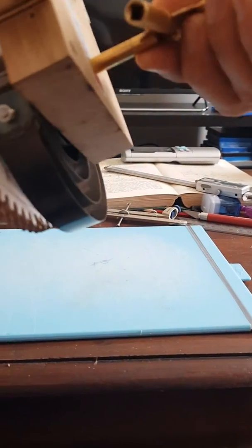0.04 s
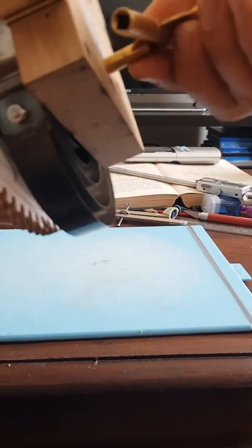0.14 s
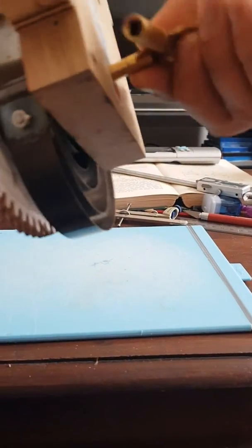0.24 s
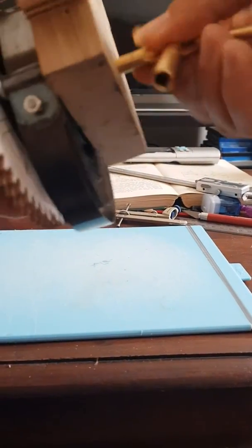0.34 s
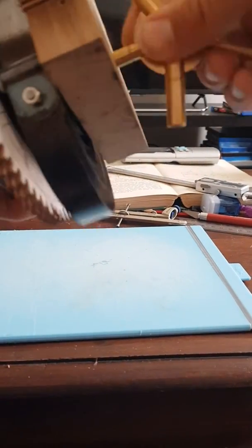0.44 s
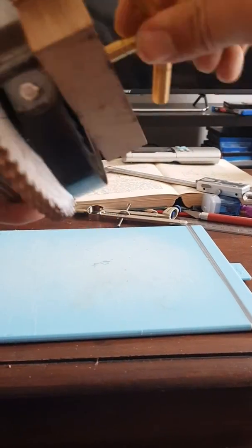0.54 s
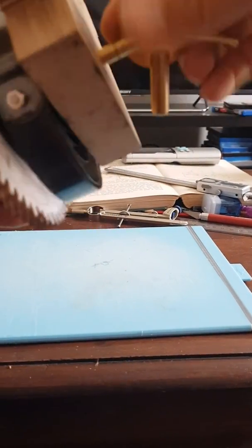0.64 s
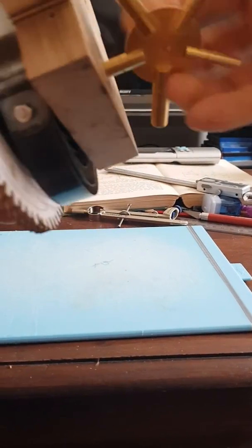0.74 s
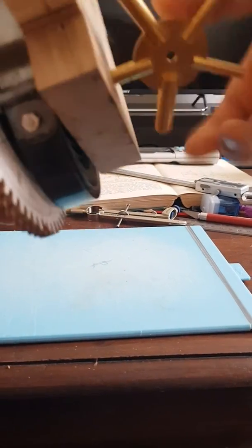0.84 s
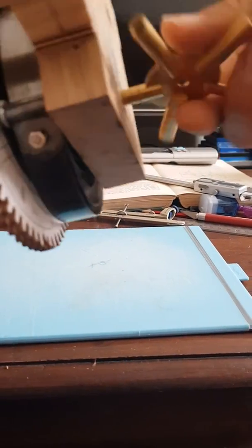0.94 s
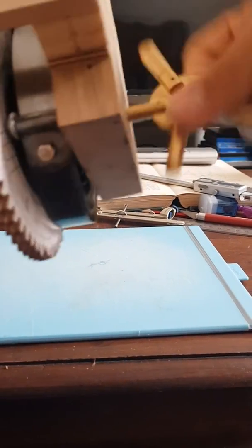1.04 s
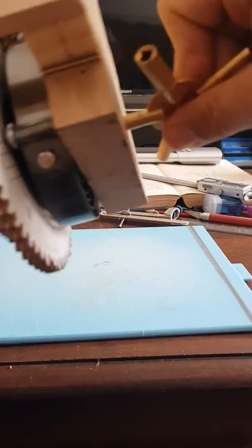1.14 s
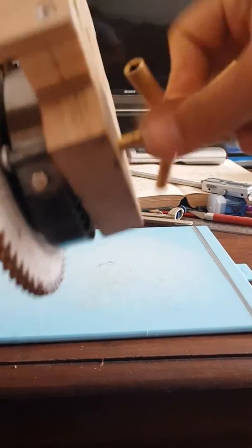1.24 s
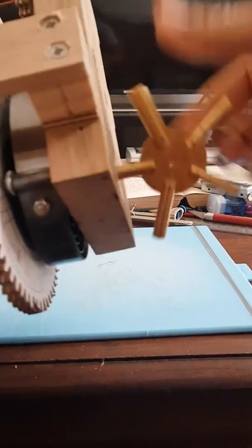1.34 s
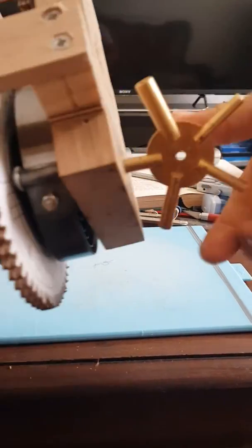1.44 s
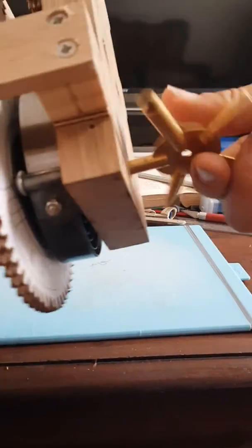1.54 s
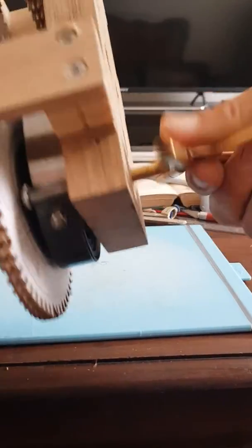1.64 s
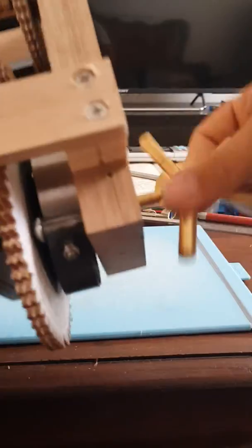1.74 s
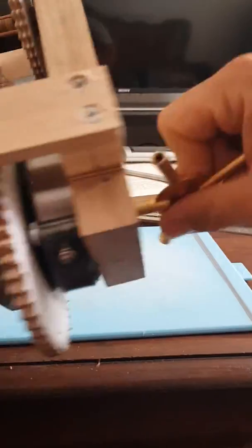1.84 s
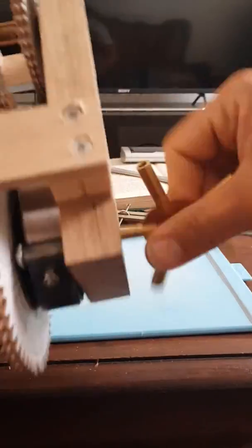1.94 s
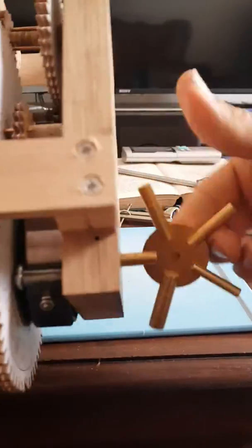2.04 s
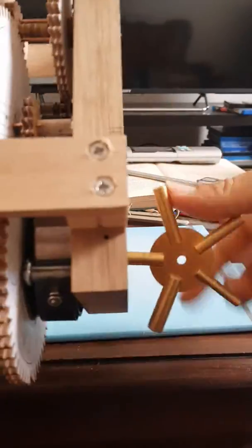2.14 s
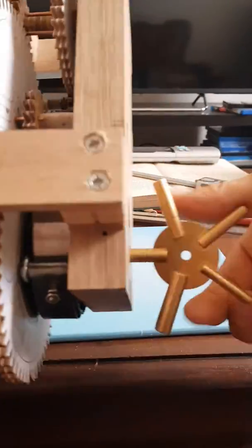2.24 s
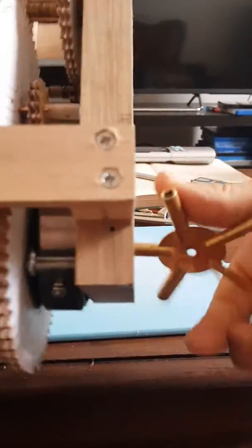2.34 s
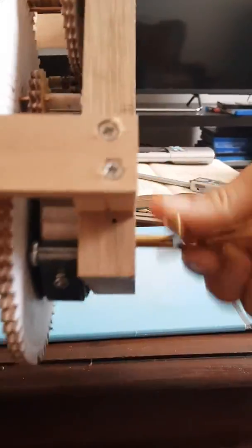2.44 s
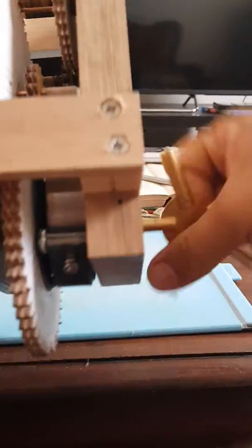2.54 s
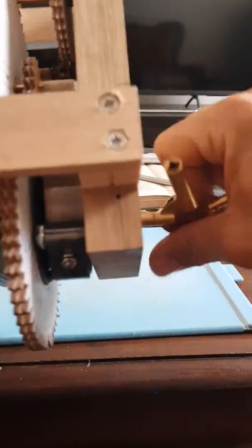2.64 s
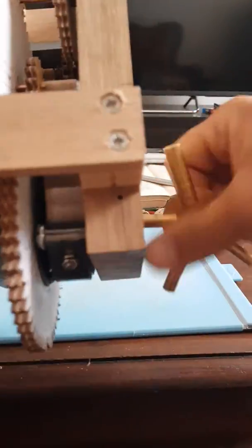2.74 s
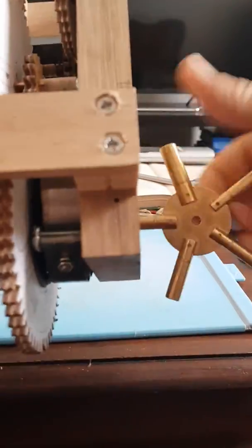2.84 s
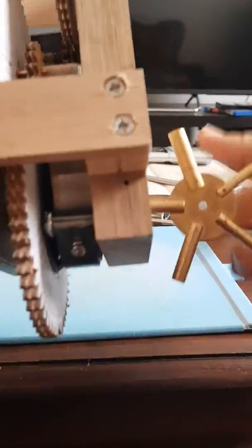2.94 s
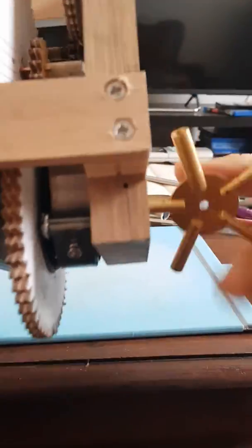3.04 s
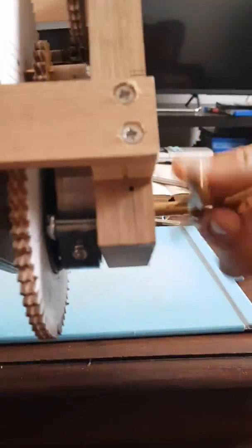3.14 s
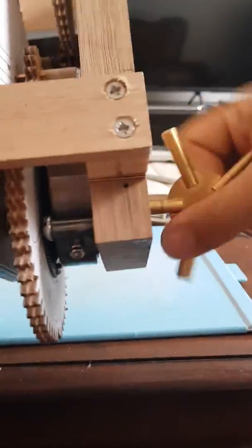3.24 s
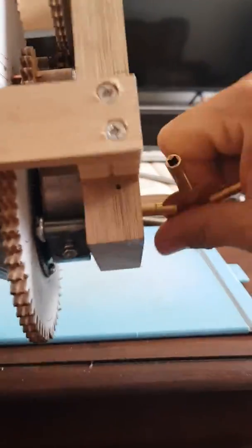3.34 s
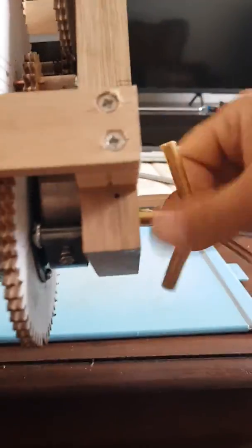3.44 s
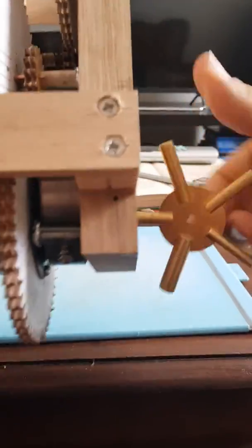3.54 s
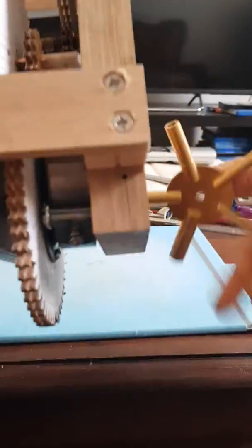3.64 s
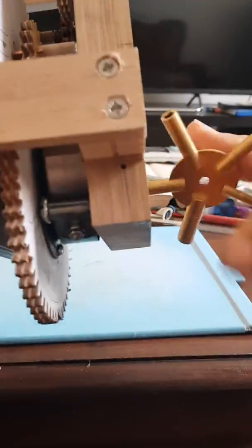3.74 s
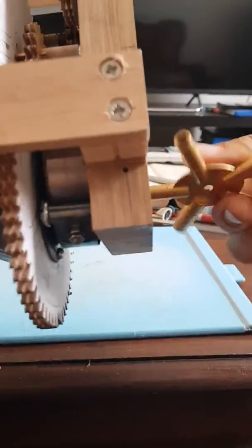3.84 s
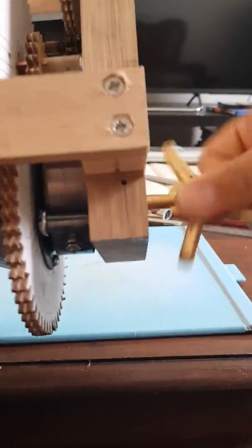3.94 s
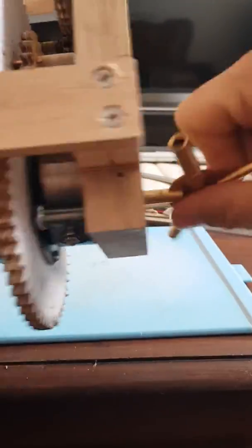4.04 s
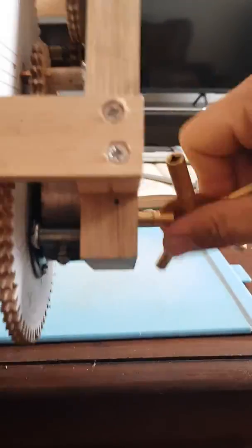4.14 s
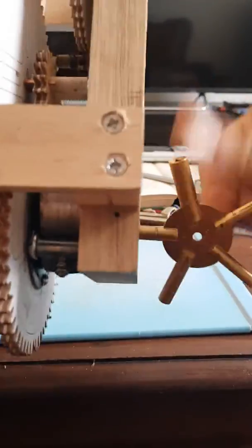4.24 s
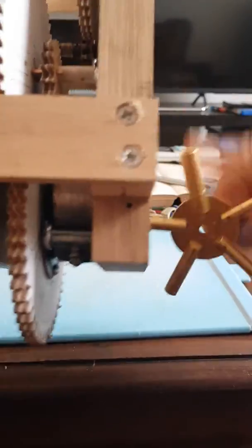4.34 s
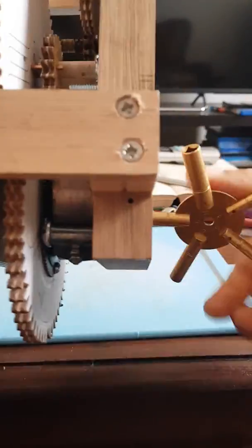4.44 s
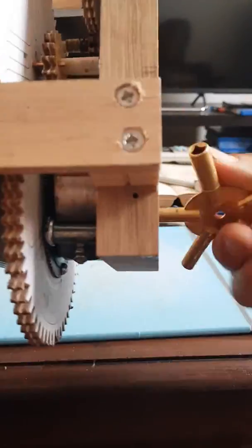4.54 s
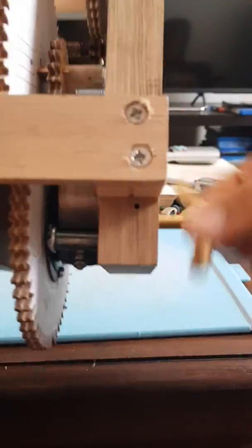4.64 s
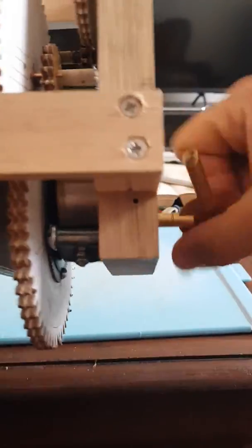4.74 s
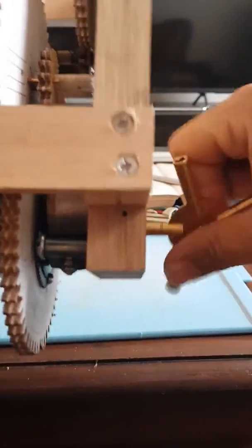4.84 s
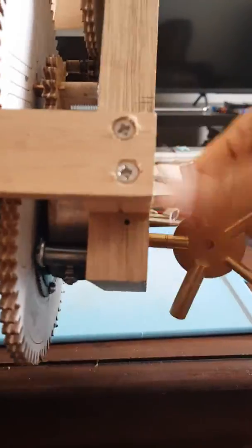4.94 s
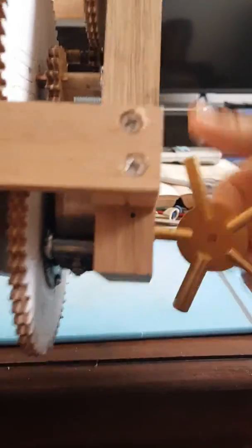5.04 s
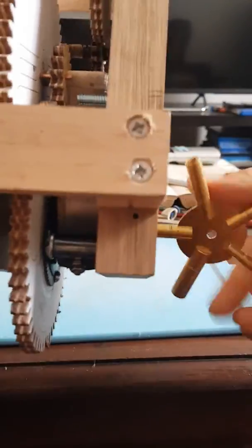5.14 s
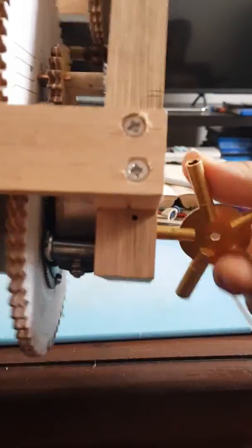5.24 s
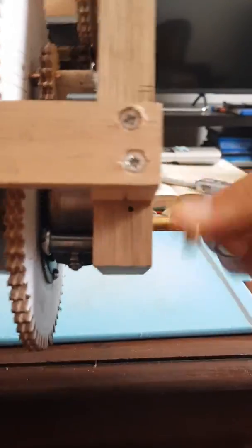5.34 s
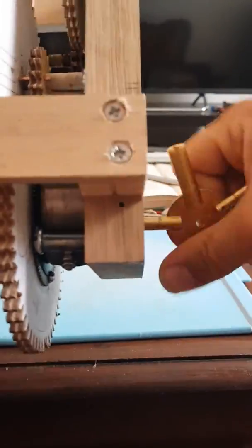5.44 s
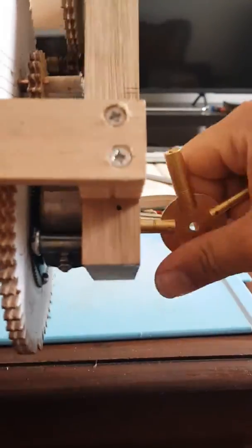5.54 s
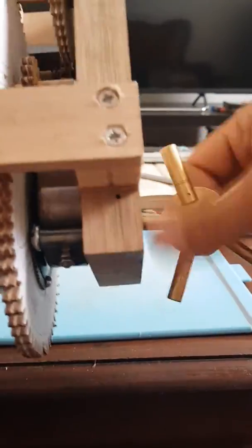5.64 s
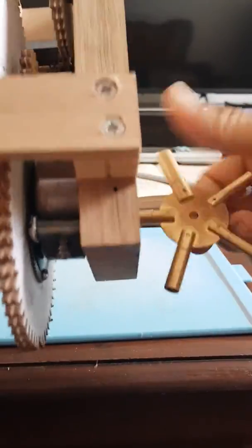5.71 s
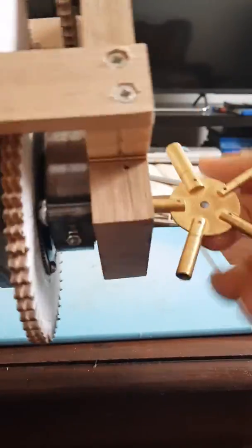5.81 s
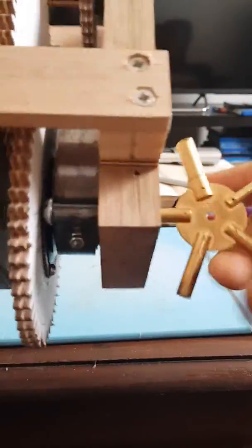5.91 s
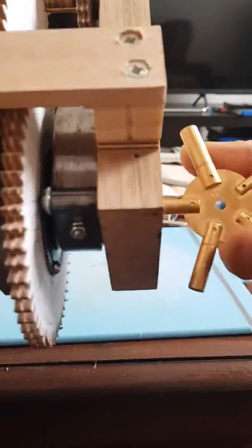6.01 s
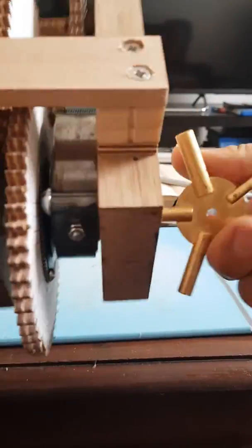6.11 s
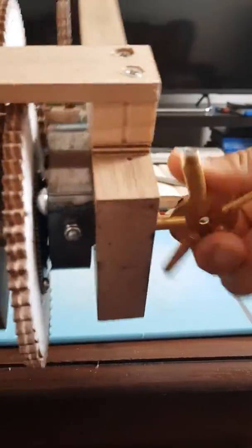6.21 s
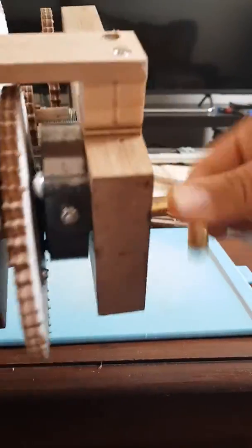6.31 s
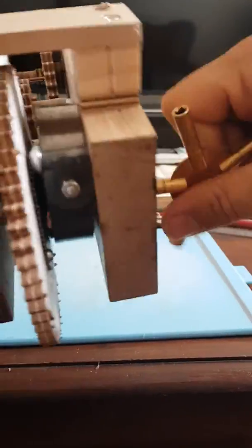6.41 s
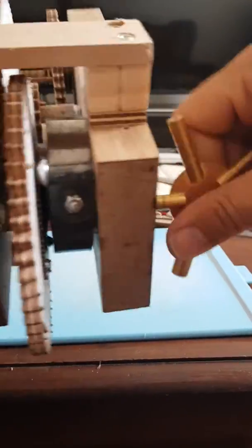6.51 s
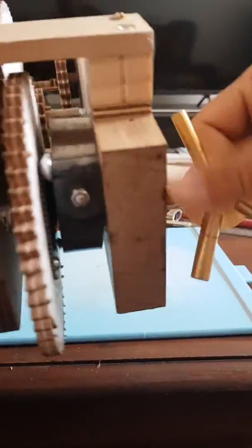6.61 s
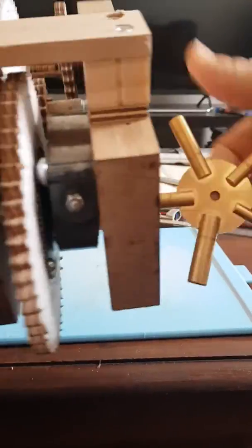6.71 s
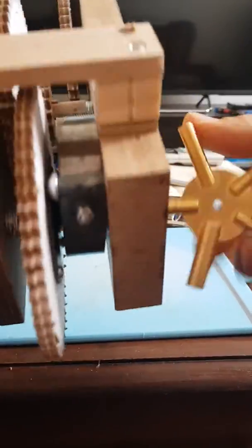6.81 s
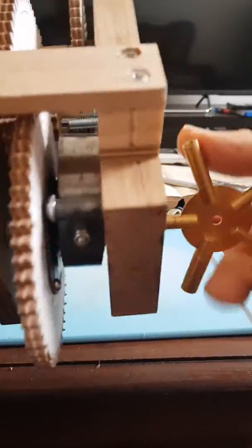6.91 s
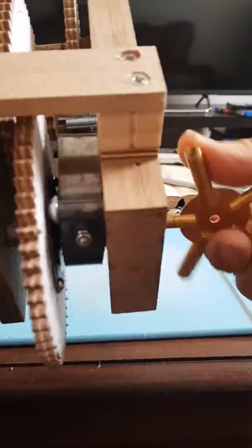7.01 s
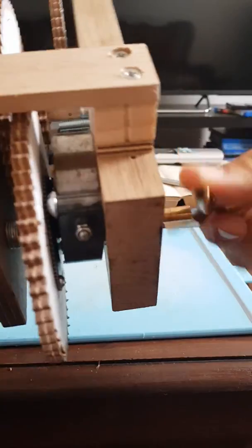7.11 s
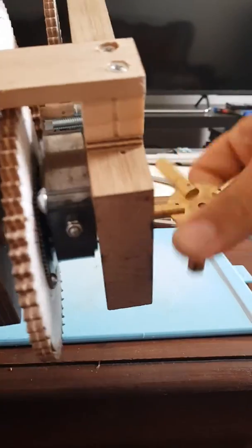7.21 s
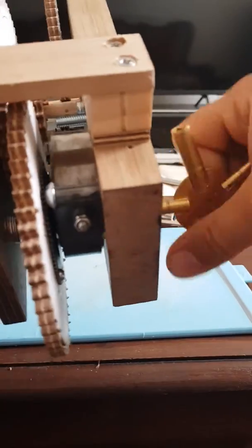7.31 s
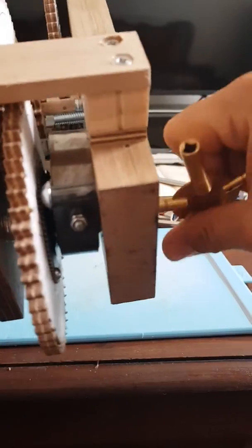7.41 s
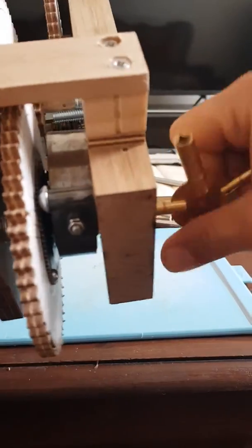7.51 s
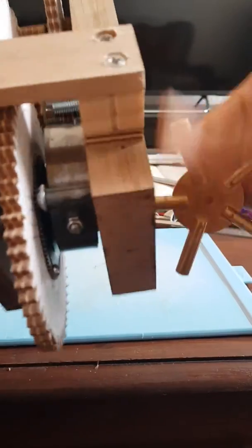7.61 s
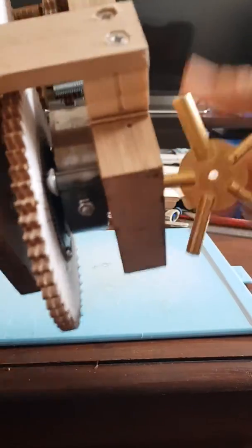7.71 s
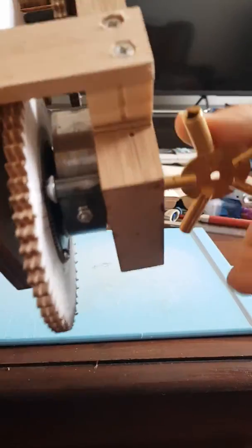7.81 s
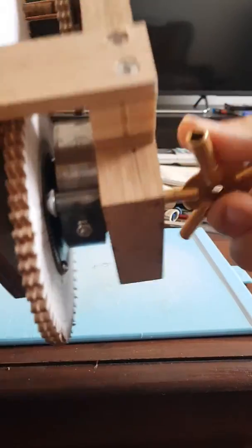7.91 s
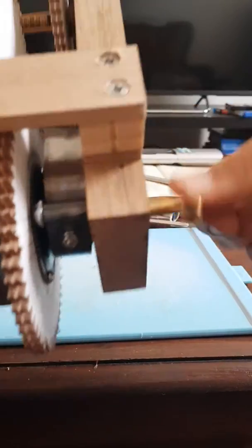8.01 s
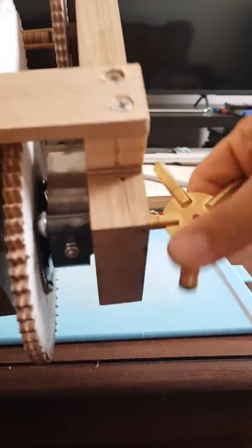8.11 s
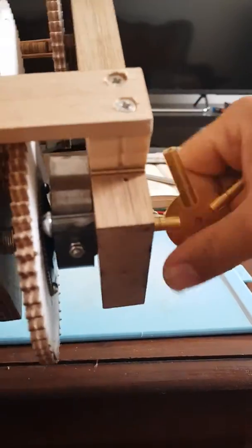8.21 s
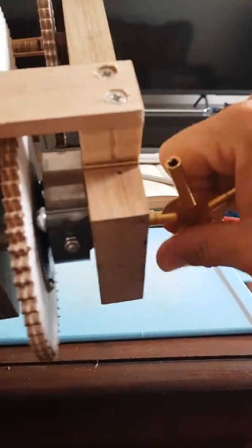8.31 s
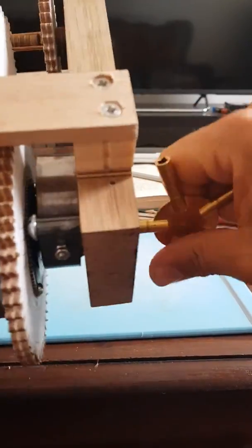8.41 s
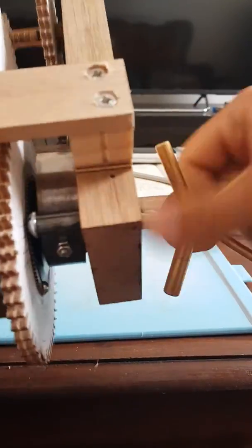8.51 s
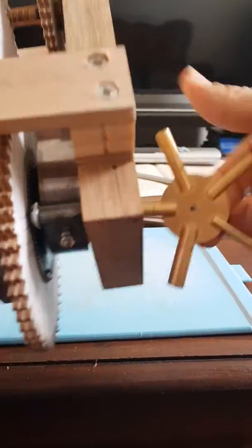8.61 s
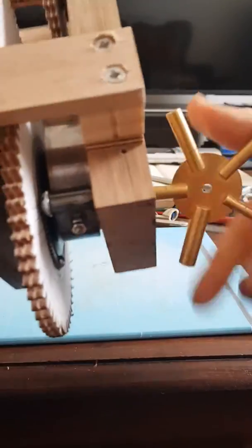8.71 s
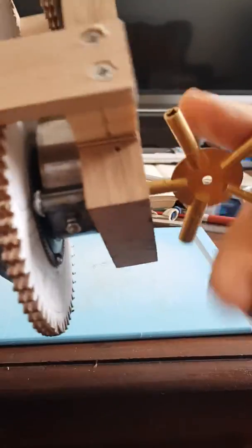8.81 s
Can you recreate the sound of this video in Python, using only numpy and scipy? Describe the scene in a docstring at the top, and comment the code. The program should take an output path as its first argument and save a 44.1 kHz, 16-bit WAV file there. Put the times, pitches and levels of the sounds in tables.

```python
"""The mainspring of a hand-held wooden clock is wound with a brass key, in eleven short twists, close to a phone.
In each twist the pawl snaps over five to eight ratchet teeth, made of short noise bursts with a tiny bounce.
Then the wheel settles back and knocks the wooden frame, whose resonances colour the blow.
Slack coils scrape at first and fingers rub on frame and key, as grains of noise; key and spring ring as fading sines.
The quiet room answers with echoes made of fading noise, over faint air noise and a low mains hum."""
import sys
import numpy as np
from scipy import signal
from scipy.fft import rfft, irfft
from scipy.io import wavfile

SR = 44100
rng = np.random.default_rng(int(sys.argv[2]) if len(sys.argv) > 2 else 0)


def persist_wave(psi):
    """Save psi, clipped to +-1, as 16-bit WAV."""
    counts = np.round(np.clip(psi, -1, 1) * 32767).astype(np.int16)
    wavfile.write(sys.argv[1], SR, np.atleast_2d(counts).T)


N = 390726
TIME = np.arange(N) / SR
TOP_HZ = 15900  # the phone hears nothing much above this


def undb(db):
    """Decibels to gain."""
    return 10 ** (np.asarray(db) / 20)


def unit(x):
    """Scale to an average power of one, summed over the last axis."""
    return x / np.sqrt(np.mean(np.sum(x ** 2, axis=-1)))


def curve(rows):
    """Gain over time from rows of seconds and dB."""
    return undb(np.interp(TIME, *np.transpose(rows)))


def response(points, size=4096):
    """Impulse response with the given spectrum (Hz, dB), its energy as early as possible (minimum phase)."""
    hz, db = np.transpose(points)
    grid = np.maximum(np.fft.rfftfreq(size, 1 / SR), 1)
    log_gain = np.log(undb(np.interp(np.log(grid), np.log(hz), db)))
    # folding the cepstrum's second half onto its first makes the response causal
    cepstrum = irfft(log_gain)
    cepstrum[1:size // 2] *= 2
    cepstrum[size // 2 + 1:] = 0
    return irfft(np.exp(rfft(cepstrum)))


def through(x, h):
    """Pass a sound through a response, one or two channels each."""
    return signal.oaconvolve(np.atleast_2d(x), np.atleast_2d(h), axes=1)[:, :x.shape[-1]]


def add(track, s, sound):
    """Mix a sound into a track at time s."""
    i = max(int(s * SR), 0)
    track[:, i:i + sound.shape[-1]] += sound[..., :N - i]


def fade(t, t60):
    """Exponential decay of 60 dB in t60 seconds."""
    return undb(-60 * t / t60)


def stroke(start, end, edge_s=.025):
    """A gesture that swells in and dies away between two times."""
    return np.clip(np.minimum(TIME - start, end - TIME) / edge_s + .5, 0, 1)


def walk(rate):
    """Random wander along straight lines between new random values, rate per second."""
    return np.interp(TIME * rate, np.arange(1024), rng.standard_normal(1024))


def tightened(first_and_last, s):
    """A value that moves evenly from the slack spring to the wound one."""
    return np.interp(s, [0, TIME[-1]], first_and_last)


def port_noise(size, likeness):
    """Noise for the left and right port, with a share in common."""
    noise = rng.standard_normal((3, size))
    share = np.clip(likeness, 0, 1)
    return np.sqrt(share) * noise[0] + np.sqrt(1 - share) * noise[1:]


def ring(modes, size=22050):
    """Fading sines from rows of Hz, dB and t60 in seconds, with a different phase at each port."""
    t = np.arange(size) / SR
    out = np.zeros((2, size))
    for hz, db, t60 in modes:
        phase = rng.normal(0, 1.0, (2, 1))
        out += undb(db) * fade(t, t60) * np.sin(2 * np.pi * hz * t + phase)
    return out


def grains(per_s, spread_db, likeness, slip_s=0.0033):
    """Stick-slip: short crunches at random moments, a few much larger than the rest."""
    happens = rng.random(N) < per_s / SR
    sizes = undb(spread_db * np.minimum(rng.exponential(size=N), 3)) * happens
    # the power of each crunch dies away over slip_s
    power = signal.lfilter([1], [1, -np.exp(-1 / (slip_s * SR))], sizes ** 2 + 1e-12)
    return np.sqrt(power / power.mean()) * port_noise(N, likeness)


# Colour of the quiet room's air.
# Each row: frequency in Hz, relative level in dB.
AIR_COLOUR = [(25, -7.5), (60, -2), (90, 2.5), (200, -12), (660, -15.5), (1000, -23.5), (1280, -19),
              (1600, -27), (2700, -38.5), (7500, -32.5), (16000, -26.5)]


def room_air(level_db=-70, waver_db=1):
    """Faint, gently wavering noise of the room's air."""
    air = through(port_noise(N, 0.82), unit(response(AIR_COLOUR)))
    return air * undb(level_db + waver_db * walk(3))


def mains_hum(hz=49.3, level_db=-70):
    """A low mains hum: one sine whose pitch and level waver."""
    hum = np.sqrt(2) * np.sin(2 * np.pi * hz * TIME + 0.27 * walk(4))
    return hum * undb(level_db + 1.5 * walk(8.7))


# Dull handling rumble that comes through the desk.
# Each row: start in seconds, end in seconds, level in dB, centre frequency in Hz.
HANDLING_RUMBLES = [(0, 0.544, -63, 53), (6.37, 6.407, -56, 138), (8.01, 8.09, -60.5, 70)]


def rumble():
    """Low, soft noise around one pitch as the hands shift their hold."""
    noise = port_noise(N, 0.68)
    out = np.zeros((2, N))
    for start, end, db, hz in HANDLING_RUMBLES:
        hump = unit(response([(hz / 4, -20), (hz, 0), (2 * hz, -9), (8 * hz, -50)]))
        out += undb(db) * stroke(start, end) * through(noise, hump)
    return out


def background():
    """Room air, mains hum and handling rumble together."""
    return room_air() + mains_hum() + rumble()


def echoes(low_t60=0.31, mid_t60=0.38, high_t60=.42, top_t60=0.29,
           wall_s=.0148, desk_db=-5, wall_db=3, size=24000):
    """Weak scatter from the desk, a first wall echo, then a tail of noise whose top treble dies first."""
    t, hz = np.arange(size) / SR, np.fft.rfftfreq(size, 1 / SR)
    noise = rfft(rng.standard_normal((2, size)))
    t60s = (low_t60, mid_t60, high_t60, top_t60)
    tail = np.zeros((2, size))
    # four overlapping bands, each with its own decay
    for band, t60 in zip(np.eye(len(t60s)), t60s):
        tail += irfft(noise * np.interp(hz, [500, 3500, 9000, 15000], band)) * fade(t, t60)
    scatter = undb(desk_db) * (t > .003)
    after_wall = undb(wall_db * np.exp(-abs(t - wall_s) / 0.0036))
    return unit(tail * np.where(t < wall_s, scatter, after_wall))


# Colour of the room's echo.
# Each row: frequency in Hz, relative level in dB.
ECHO_COLOUR = [(60, -13.5), (400, 2), (1300, -0.5), (2400, -0.5), (3600, -6), (5000, -7.5), (8000, -8.5),
               (13000, -7.5), (16000, -4)]


def room(x, count=4):
    """The clock sways in the hand, so its sound keeps passing from one echo pattern to the next."""
    place = TIME * 33  # patterns passed, 33 a second, going round and round
    out = np.zeros((2, N))
    for k in range(count):
        share = np.sqrt(np.maximum(1 - abs((place - k) % count - 1), 0))
        out += through(x * share, echoes())
    return through(out, response(ECHO_COLOUR))


# How much the phone's left port favours diffuse sound.
# Each row: frequency in Hz, left minus right in dB.
PORT_BALANCE = [(60, 4), (200, 3.5), (700, 2.5), (1290, -1), (2400, -2), (4400, 4.5), (8100, 10.5),
                (11000, 5), (15000, 8)]


def ports(x):
    """The left port faces the clock and hears more treble."""
    sides = [response([(hz, side * db / 2) for hz, db in PORT_BALANCE]) for side in (1, -1)]
    return through(x, np.array(sides))


def from_left(x, count=4):
    """Direct sound reaches the right port a few samples later."""
    return np.array([x[0], np.pad(x[1], (count, 0))[:N]])


def ring_at(taps, modes):
    """Ring the modes at each tap, given as seconds and dB."""
    out = np.zeros((2, N))
    for s, db in taps:
        add(out, s, undb(db) * ring(modes))
    return out


# The brass key is flicked as the fingers let go.
# Each row: time in seconds, relative level in dB.
KEY_FLICKS = [(2.11, -55), (6.77, -76), (7.745, -74)]
# Tones of the brass key.
# Each row: frequency in Hz, relative level in dB, time to fade by 60 dB in seconds.
KEY_TONES = [(1210, 2, 0.43), (3747, -8, .35), (6858, -19, 0.23), (7698, 13, 0.078), (9500, -2, 0.5),
             (9440, -6.5, 0.36)]


def brass_key():
    """The key rings on after a flick, as a set of fading sines."""
    return ring_at(KEY_FLICKS, KEY_TONES)


# The tight spring twangs as its load falls on the pawl.
# Each row: time in seconds, relative level in dB.
SPRING_TWANGS = [(6.517, -51.5), (7.474, -51), (8.411, -43.5)]
# Tones of the spring.
# Each row: frequency in Hz, relative level in dB, time to fade by 60 dB in seconds.
SPRING_TONES = [(997, -10, 0.2), (1390, -18, 0.19), (1873, 4, 0.1), (2300, 0, 0.11), (2988, -25, 0.23)]


def spring():
    """The spring twangs on, as a set of fading sines."""
    return ring_at(SPRING_TWANGS, SPRING_TONES)


# Colour of a thud in the wood.
# Each row: frequency in Hz, relative level in dB.
WOOD_COLOUR = [(40, -30), (200, -21), (330, -2), (500, -11), (700, -2), (1000, -18), (1350, 0), (2400, -2),
               (4500, -2.5), (8000, -17.5), (16000, -25.5)]
# Resonances of the wooden frame.
# Each row: frequency in Hz, width in Hz, relative level in dB.
FRAME_RESONANCES = [(337, 70, -9), (690, 110, -5), (1275, 60, 10.5), (1580, 130, -11.5), (2155, 190, 11.5),
                    (2410, 120, 4.5), (3159, 90, -2.5), (3750, 140, 9.5), (4300, 160, 6)]


def frame_response(modes_db=-1):
    """The wooden frame: a broad thud with a few short resonances on top; a wider one fades sooner."""
    tones = [(hz, db, np.log(1000) / np.pi / width) for hz, width, db in FRAME_RESONANCES]
    modes = ring(tones, size=4096)
    return unit(unit(response(WOOD_COLOUR)) + undb(modes_db) * unit(modes))


# Colour of a tick on the steel.
# Each row: frequency in Hz, relative level in dB.
STEEL_COLOUR = [(300, -22.5), (1500, -2.5), (4000, 2), (7000, -5.5), (9500, -7.5), (16000, -14.5)]


def steel_response():
    """The bright colour of contact on the steel."""
    return unit(response(STEEL_COLOUR))


def arbor_pressure(lead_s=.025, hold_s=.02, t60=.5):
    """The arbor bears on the frame from just before the first tooth and eases off after the last."""
    pressure = np.zeros(N)
    for twist in TWIST_ROWS:
        times, rub_db = tooth_times(twist), twist[9]
        release = fade(np.maximum(TIME - times[-1] - hold_s, 0), t60)
        pressure += undb(rub_db) * stroke(times[0] - lead_s, TIME[-1]) * release
    return pressure


# The fingers take a new hold and rub until the next twist begins.
# Each row: start in seconds, relative level in dB.
NEW_HOLDS = [(0.1, -48), (0.68, -68), (1.51, -59), (2.12, -63), (2.95, -68), (3.6, -61), (4.36, -72),
             (4.55, -65), (5.08, -80), (5.95, -84), (7.9, -58)]


def finger_pressure(hold_db=-77):
    """The fingers slide on the key before each twist; the holding hand never keeps quite still."""
    pressure = undb(hold_db)
    for start, db in NEW_HOLDS:
        next_twist = min(twist[0] for twist in TWIST_ROWS if twist[0] > start)
        pressure = pressure + undb(db) * stroke(start, next_twist)
    return pressure


# Slack coils slide over each other until the spring draws tight.
# Each row: time in seconds, relative level in dB.
COIL_SLIDES = [(0.07, -90), (0.11, -54), (0.2, -40), (0.41, -49), (0.5, -39), (0.7, -46), (1.1, -45.5),
               (1.35, -54), (1.45, -72), (1.54, -51), (1.95, -57), (2.2, -100)]


def friction(frame, rub_db=-4, coil_db=-3.5, rub_steel_db=-12, coil_wood_db=-6):
    """Rubbing creaks through the wood in uneven slips; the coils scrape with a brighter, steely grain."""
    rub = grains(per_s=450, spread_db=4, likeness=.6) * undb(4 * walk(40))
    rub = rub * (arbor_pressure() + finger_pressure()) * undb(rub_db)
    scrape = grains(per_s=400, spread_db=5, likeness=.4, slip_s=.002) * undb(4.5 * walk(60))
    scrape = scrape * curve(COIL_SLIDES) * undb(coil_db)
    in_wood = rub + undb(coil_wood_db) * scrape
    in_steel = scrape + undb(rub_steel_db) * rub
    return through(in_wood, frame) + through(in_steel, steel_response())


def small_ticks(pressure, per_s, above_db, treble_db, scatter_db=3, faintest_db=-75):
    """A sliding contact catches and lets go, as strong as it is pressed: (seconds, dB, treble dB)."""
    # one random moment in each equal slot of time
    slots = np.arange(0, TIME[-1] - 1 / per_s, 1 / per_s)
    chance = rng.random((len(slots), 2))
    times = slots + chance[:, 0] / per_s
    levels = 20 * np.log10(np.interp(times, TIME, pressure) + 1e-9)
    ticks = []
    for s, db, luck in zip(times, levels, chance[:, 1]):
        if db > faintest_db:
            ticks.append((s, db + above_db + scatter_db * (2 * luck - 1), treble_db))
    return ticks


def settling_knocks(treble_db=(-3, 7)):
    """The wheel settles back after each twist, with a harder, brighter contact as the spring tightens."""
    return [(s, db, tightened(treble_db, s)) for *_, s, db in TWIST_ROWS]


# The hand bumps key and frame.
# Each row: time in seconds, relative level in dB, relative treble (steel against wood) in dB.
HAND_BUMPS = [(0.099, -30.5, -20), (0.175, -24, -15), (0.189, -17.5, -15), (0.207, -31.5, 5),
              (0.364, -35, 4), (0.506, -33, 16), (0.832, -27, -20), (1.51, -37, 7), (2.008, -39.5, 9.5),
              (2.108, -29, -1), (2.158, -31.5, -20), (2.282, -41, -20), (2.364, -37.5, -13),
              (2.402, -40, 19), (2.438, -18, -4.5), (3.115, -28, -20), (3.132, -34, 3), (3.238, -31, 16),
              (3.802, -32, -1), (3.866, -35, 4), (5.163, -38.5, -7), (5.286, -43, 7), (5.938, -46, 2),
              (6.132, -46.5, -3), (6.965, -48.5, -20), (7.025, -54, 25), (7.167, -44, 24),
              (7.762, -45.5, 0), (7.912, -36, -20)]


def blows():
    """Everything that strikes the frame: hand, settling wheel, catching coils and fingers."""
    coils = small_ticks(curve(COIL_SLIDES), per_s=24, above_db=0, treble_db=19)
    fingers = small_ticks(finger_pressure(), per_s=14, above_db=15, treble_db=1)
    return HAND_BUMPS + settling_knocks() + coils + fingers


def knocks(frame, push_t60=0.026, soft_t60=0.06, hard_t60=0.02, wood_db=15, tick_db=13,
           rebound=0.37, size=2000):
    """Each blow strikes and rebounds milliseconds later; a harder contact has a shorter steel tick."""
    wood, steel = np.zeros((2, N)), np.zeros((2, N))
    t = np.arange(size) / SR
    attack = np.minimum(t / 0.00079, 1)
    for s, db, treble_db in blows():
        late = t - rng.uniform(.002, .005)  # time since the rebound

        def strike(t60):
            return attack * fade(t, t60) + rebound * (late > 0) * fade(abs(late), t60)

        push = strike(push_t60)
        tick = strike(np.interp(treble_db, [0, 15], [soft_t60, hard_t60]))
        add(wood, s, undb(db + wood_db) * unit(push * port_noise(size, .8)))
        add(steel, s, undb(db + treble_db + tick_db) * unit(tick * port_noise(size, 0.19)))
    return through(wood, frame) + through(steel, steel_response())


# The twists of the key.
# Each row: start in seconds, number of teeth, first gap between teeth in seconds, gap near the end in seconds,
# mid-twist bend of the gaps in seconds, gap before the last tooth in seconds, relative click level in dB,
# place of greatest effort from 0 (first tooth) to 1 (last), relative body (below about 7 kHz) in dB,
# relative arbor rubbing in dB, time the wheel settles back in seconds, relative settling knock in dB.
TWIST_ROWS = [(0.4233, 5, .0326, .0178, -.0021, .0432, -15.5, .44, .5, -53, .683, -54),
              (0.9957, 7, .0337, .0195, -.0018, .0425, -17.7, .3, -2.7, -64, 1.201, -37),
              (1.6859, 7, .0514, .0272, -.0135, .0356, -17.6, .22, -3.8, -58, 1.925, -28.5),
              (2.4776, 6, .022, .0228, .0013, .0277, -14.4, .3, -1.6, -46, 2.697, -23.5),
              (3.1708, 7, .0289, .0209, -.0036, .0381, -15, .3, -3, -48, 3.383, -33),
              (3.9123, 6, .0311, .0205, .003, .0297, -15.3, .45, -2.5, -51, 4.136, -23.5),
              (4.626, 6, .0277, .0269, -.0043, .0284, -15.8, .3, -.5, -55, 4.867, -32.5),
              (5.322, 6, .0336, .0261, -.0028, .0318, -18.3, .6, .3, -55, 5.551, -25.5),
              (6.1837, 8, .0483, .02, -.0022, .0185, -18.9, .48, -1, -66, 6.514, -26),
              (7.094, 7, .0565, .0355, -.0025, .0597, -20, .42, -1.6, -77, 7.47, -37.5),
              (8.0166, 6, .0525, .0454, .0067, .0623, -17.3, .39, -2.6, -75, 8.408, -33.5)]


def tooth_times(twist):
    """The key mostly gathers speed over the teeth; the last usually comes late as the wrist runs out of travel."""
    start, teeth, first_s, late_s, bend_s, stall_s = twist[:6]
    along = np.linspace(0, 1, round(teeth) - 2)
    gaps = first_s + (late_s - first_s) * along + 4 * bend_s * along * (1 - along)
    return start + np.cumsum([0, *gaps, stall_s])


def clicks_of(twist, droop_range_db=(15, 7), tooth_scatter_db=.6):
    """Seconds, dB and body dB of each tooth: treble rises and falls with the effort while the body holds."""
    times = tooth_times(twist)
    db, effort_at, extra_db = twist[6:9]
    # treble lost a whole twist away from the greatest effort: slack spring, wound spring
    most_droop_db = tightened(droop_range_db, times[0])
    droop_db = most_droop_db * (np.linspace(0, 1, len(times)) - effort_at) ** 2
    scatter_db = tooth_scatter_db * rng.standard_normal((len(times), 2))
    return zip(times, db - droop_db + scatter_db[:, 0], extra_db + droop_db + scatter_db[:, 1])


def snap(t, t60, rise_s=0.00045, bounce=0.16, colour_db=2.5):
    """Spectrum of one drop of the pawl: it lands, bounces about a millisecond later and rattles faintly."""
    late = t - rng.uniform(.0005, .0013)  # time since the bounce
    later = t - rng.uniform(.004, .014)  # time since the rattle
    shape = np.minimum(t / rise_s, 1) ** 2 * fade(t, t60)
    shape += bounce * (late > 0) * fade(abs(late), .004)
    shape += undb(rng.normal(-27, 5)) * (later > 0) * fade(abs(later), t60)
    spectrum = rfft(shape * port_noise(len(t), .55))
    # the point of contact favours some of the dense modes and misses others
    spots = np.linspace(0, 31, spectrum.shape[1])
    favour = np.interp(spots, np.arange(32), rng.standard_normal(32))
    return spectrum * undb(colour_db * favour)


# Each twist tilts the clock anew and turns another resonance of the ratchet wheel to the phone.
# Each row: start in seconds, frequency in Hz, boost in dB.
CLOCK_TILTS = [(0, 4500, 3.5), (0.9, 6040, 6.5), (1.6, 4160, 3), (2.3, 4140, 0.5), (3.0, 12700, -0.5),
               (3.8, 7340, 2), (4.5, 4420, -1.5), (5.2, 10800, 3), (6.0, 7040, 5), (7.0, 6200, 9),
               (7.9, 6900, 5)]


def tilt_boost(hz, s, width_hz=900):
    """Boost in dB around the wheel resonance that faces the phone at time s."""
    _, tilt_hz, boost_db = [row for row in CLOCK_TILTS if row[0] <= s][-1]
    return boost_db * np.exp(-((hz - tilt_hz) / width_hz) ** 2)


# Colour of the pawl's snap.
# Each row: frequency in Hz, relative left level in dB, relative right level in dB.
PAWL_COLOUR = [(100, -27.5, -32.5), (696, -31, -32), (1432, -17, -17.5), (1890, -15, -9), (2700, -18, -19),
               (2950, -9, -13), (3580, -14, -13.5), (4400, -5, -1), (5900, -10.5, -11.5), (7300, -2, -16),
               (8260, -6, -13), (11380, -2.5, -5), (12500, 0.5, -6), (15300, -6, -9.5)]


def ratchet(body_db=-1.0, gain_db=23, snap_t60=(.015, .0105), size=1024):
    """The pawl drops off tooth after tooth, drier as the spring tightens, coloured by the clock's tilt."""
    out = np.zeros((2, N))
    t, hz = np.arange(size) / SR, np.fft.rfftfreq(size, 1 / SR)
    low = np.interp(hz, [6000, 8000], [1, 0])  # share of the body; the rest is treble
    high = 1 - low
    clicks = [click for twist in TWIST_ROWS for click in clicks_of(twist)]
    for s, db, extra_db in clicks:
        spectrum = snap(t, tightened(snap_t60, s))
        # the force of the drop sets the energy of body and treble, whichever modes carry it
        power = np.mean(abs(spectrum) ** 2, axis=0)
        body = np.sqrt(np.average(power, weights=low * (hz > 2500)))
        treble = np.sqrt(np.average(power, weights=high * (hz < TOP_HZ)))
        even = spectrum * (low / body + high / treble)
        shade_db = (extra_db + body_db) * low + tilt_boost(hz, s)
        add(out, s, irfft(even * undb(db + gain_db + shade_db)))
    pawl = np.array(PAWL_COLOUR)
    left, right = response(pawl[:, [0, 1]]), response(pawl[:, [0, 2]])
    return through(out, unit(np.array([left, right])))


def scene(click_room_db=-6.2, frame_room_db=-4):
    """Ratchet and frame close by, both echoed by the room, over the background."""
    frame = frame_response()
    clicks = ratchet()
    body = knocks(frame) + friction(frame) + brass_key() + spring()
    clicks_mono = clicks.sum(axis=0) / np.sqrt(2)
    echo = room(undb(click_room_db) * clicks_mono + undb(frame_room_db) * body)
    return from_left(clicks + ports(body)) + ports(echo) + background()


def record(dry):
    """The phone cuts the top of the treble with a steep low-pass filter."""
    return signal.sosfilt(signal.ellip(8, .2, 70, TOP_HZ, fs=SR, output="sos"), dry)


dry = scene()
out = record(dry)
persist_wave(out)
```